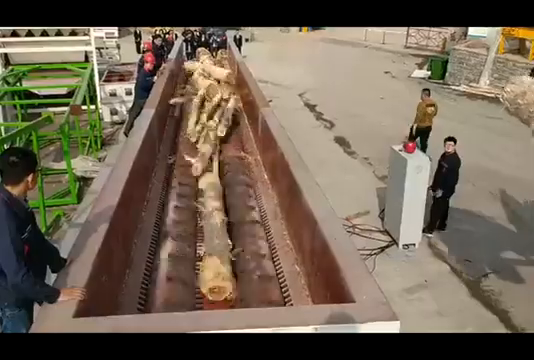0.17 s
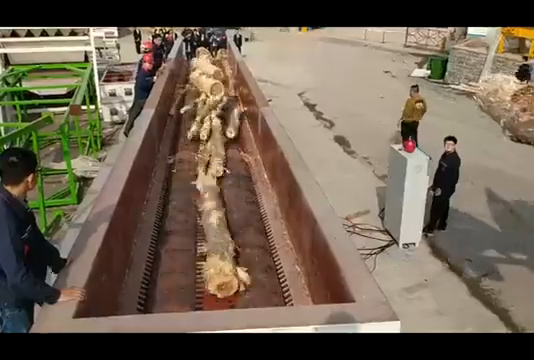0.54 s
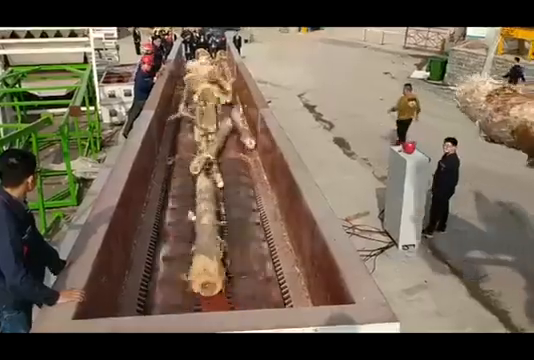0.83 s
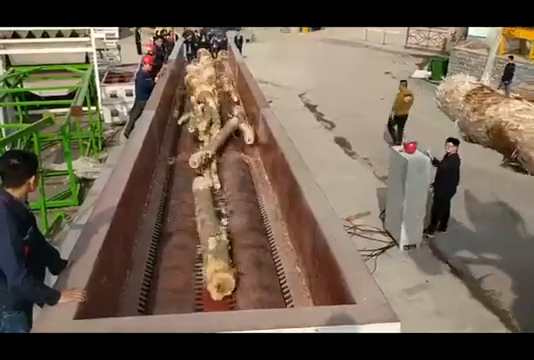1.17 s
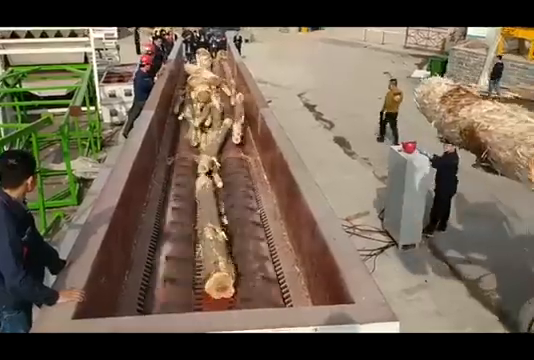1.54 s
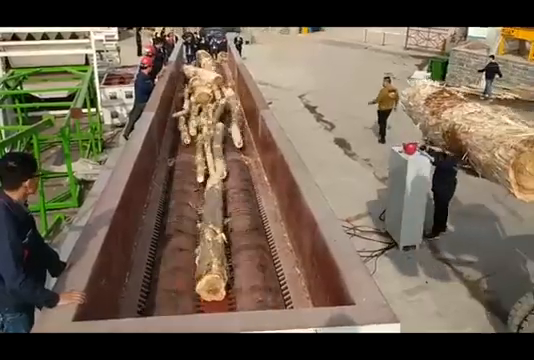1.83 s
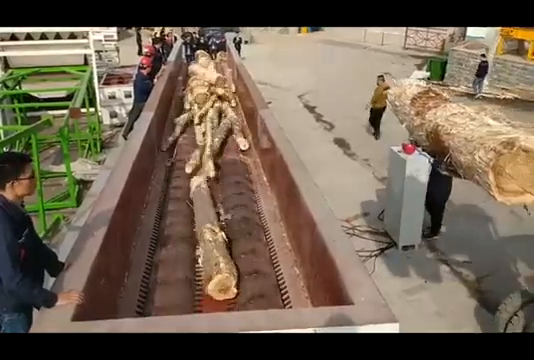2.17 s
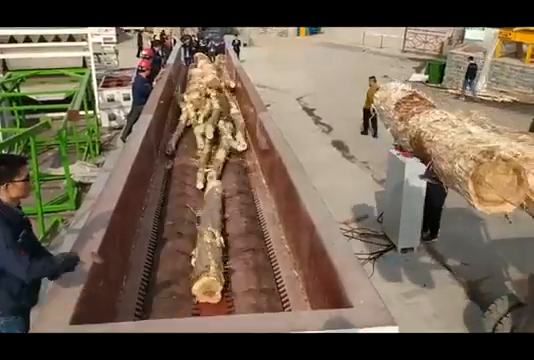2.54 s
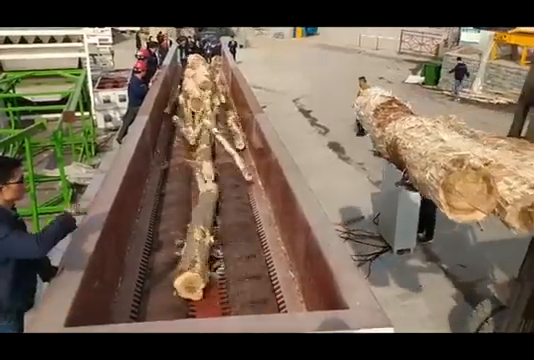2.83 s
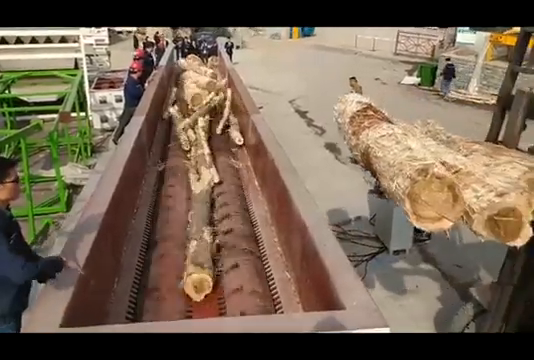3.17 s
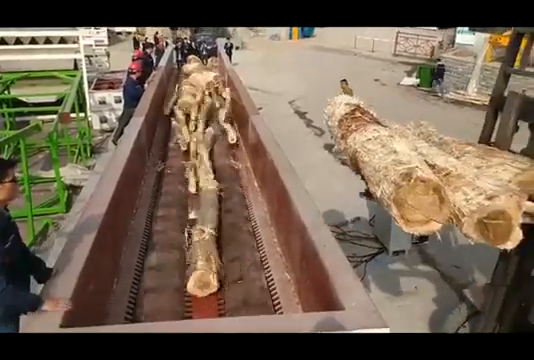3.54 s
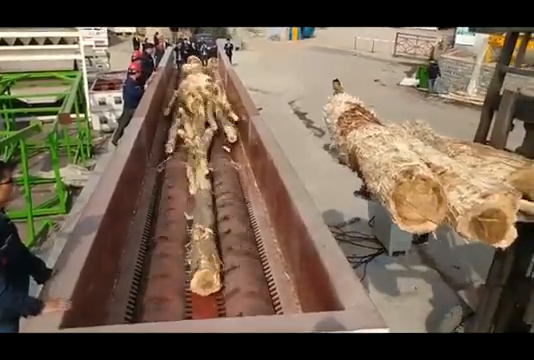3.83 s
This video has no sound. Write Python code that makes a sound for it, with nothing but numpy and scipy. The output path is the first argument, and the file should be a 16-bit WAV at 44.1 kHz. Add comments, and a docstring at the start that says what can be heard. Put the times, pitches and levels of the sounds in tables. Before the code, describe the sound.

After a brief silence, a log debarking machine cuts in at full roar: logs tumble and knock, the steel trough booms, teeth scrape bark. Outdoors, close at the trough's end, in stereo with dulled top.

```python
"""Outdoors, at the end of a debarking machine's long steel trough: logs tumble in a roar that cuts in abruptly.
Harmonic sines make a wavering drive hum. Toothed rotors thump the logs and boom the trough: noise bursts
through panel resonances; single panels groan as bent sines. Knocks of wood are damped mode clusters.
The teeth scrape, rasp off bark and set the steel ringing, more on the left: shaped noise and swelling modes."""
import sys
import numpy as np
from scipy import signal
from scipy.fft import rfft, irfft, next_fast_len
from scipy.io import wavfile
from scipy.ndimage import uniform_filter1d, map_coordinates

SR = 44100
rng = np.random.default_rng(int(sys.argv[2]) if len(sys.argv) > 2 else 0)


def wav_record(signal):
    """Record a signal, one row per channel, as 16-bit PCM in the file named by sys.argv[1]."""
    frames = np.transpose(np.atleast_2d(signal))
    bounded = np.clip(frames, -1, 1)
    # unit amplitude maps onto the largest positive 16-bit level
    quanta = np.round(bounded * 32767).astype(np.int16)
    wavfile.write(sys.argv[1], SR, quanta)


N = 176400


def amp(db):
    """Decibels to gain."""
    return 10 ** (np.asarray(db) / 20)


def unit(x):
    """Scale to rms 1."""
    return x / np.sqrt(np.mean(x ** 2) + 1e-20)


def along(points, hz):
    """Interpolate (Hz, value) points on a log frequency axis."""
    point_hz, value = np.transpose(points)
    return np.interp(np.log(hz + 1), np.log(point_hz + 1), value)


def curves(rows):
    """One value per sample for each column after the time."""
    time_s, *columns = np.transpose(rows)
    return [np.interp(np.arange(N) / SR, time_s, column) for column in columns]


def wobble(knots_per_s):
    """A smooth random curve through normal random knots."""
    return map_coordinates(rng.standard_normal(1000), [np.arange(N) * knots_per_s / SR], mode="wrap")


def filtered(x, response):
    """Multiply the spectrum of x by a complex response of frequency."""
    size = next_fast_len(N + SR // 2)
    hz = np.fft.rfftfreq(size, 1 / SR)
    return irfft(rfft(x, size) * response(hz), size)[..., :N]


def coloured(x, spectrum):
    """Shape x by a spectrum, at rms 1."""
    return unit(filtered(x, lambda hz: amp(along(spectrum, hz))))


def resonate(x, modes):
    """Ring a set of second-order band-pass modes with x, at rms 1."""
    def response(f):
        return sum(amp(db) * 1j * f * width / (hz * hz - f * f + 1j * f * width) for hz, width, db in modes)
    return unit(filtered(x, response))


MODE_SWELL_DB, MODE_SWELLS_PER_S = 2.5, 14


def shifting(x, modes):
    """Ring modes that each swell and fade at random on their own, at rms 1."""
    total = 0
    for hz, width_hz, db in modes:
        gain = amp(db + MODE_SWELL_DB * wobble(MODE_SWELLS_PER_S))
        total = total + gain * np.sqrt(abs(width_hz)) * resonate(x, [(hz, width_hz, 0)])
    return unit(total)


CONTACTS_PER_S, CONTACT_SPREAD_DB = 500, 0.5


def contacts(t60_s, bed):
    """Two channels of decaying noise bursts at shared random moments, over a steady bed."""
    struck = rng.random(N) < CONTACTS_PER_S / SR
    hit_power = struck * amp(-CONTACT_SPREAD_DB * rng.random(N)) ** 2
    power = signal.lfilter([1], [1, -amp(-120 / (t60_s * SR))], hit_power)
    envelope = np.sqrt(power / power.mean() + abs(bed))
    return unit(envelope * rng.standard_normal((2, N)))


def patchy(x, depth_db):
    """Shift the colour of x at random, in small short-lived time-frequency patches."""
    z = signal.stft(x, nperseg=1024)[2]
    field = rng.standard_normal(z.shape[1:])
    field = uniform_filter1d(field, size=3, axis=0)  # bins
    field = uniform_filter1d(field, size=5, axis=1)  # frames
    return unit(signal.istft(z * amp(depth_db * unit(field)), nperseg=1024)[1][:, :N])


# hum's third harmonic: time_s, pitch_hz, level_db
DRIVE_THIRD = [(.4, 223.6, -27), (.9, 219.7, -25.5), (1.25, 224.1, -21.5), (1.55, 221.1, -27),
               (1.7, 222.9, -18), (1.87, 220, -16.5), (2.06, 222.6, -13.5), (2.17, 223.7, -25.5),
               (2.45, 229.7, -20), (2.57, 221.9, -21.5), (2.74, 224, -19), (2.9, 217.8, -30),
               (4, 222.3, -28.5)]
# other harmonics: harmonic_number, level_db
DRIVE_OTHERS = [(2, -32.5), (4, -28.5)]
HUM_WAVER_DB = 2.5


def drive():
    """The drive's hum: locked harmonics; the third swells as the load changes."""
    third_hz, third_db = curves(DRIVE_THIRD)
    turn_rad = 2 * np.pi * np.cumsum(third_hz) / SR / 3  # phase of the fundamental
    hum = amp(third_db) * np.sin(3 * turn_rad + .17 * wobble(12))
    for harmonic, level_db in DRIVE_OTHERS:
        gain = amp(level_db + HUM_WAVER_DB * wobble(6))
        hum = hum + gain * np.sin(round(harmonic) * turn_rad + 0.77 * wobble(8))
    return np.sqrt(2) * hum


# panel groans: middle_s, length_s, pitch_hz, level_db
PANEL_GROANS = [(0.967, .25, 183, -25), (2.247, 0.54, 147.8, -24.5), (3.08, 0.35, 188.4, -27),
                (3.67, .13, 147.9, -20.5), (3.784, .2, 301, -21.5)]


def groans():
    """A log dragged along the wall makes one panel sing for a moment: a phase-wavering sine."""
    t_s = np.arange(N) / SR
    total = np.zeros(N)
    for middle_s, length_s, pitch_hz, level_db in PANEL_GROANS:
        swell = np.exp(-(2 * (t_s - middle_s) / length_s) ** 4)
        total += amp(level_db) * swell * np.sin(2 * np.pi * pitch_hz * t_s + .5 * wobble(10))
    return np.sqrt(2) * total


# trough boom: time_s, level_db
BOOM_LEVEL = [(.4, -16.5), (1.6, -16), (2.18, -18.5), (2.33, -15), (2.45, -20.5), (2.8, -17.5),
              (3.1, -17.5), (3.55, -17.5), (3.85, -16.5)]
# trough panel modes: pitch_hz, width_hz, relative_db
PANEL_MODES = [(68.5, 7.3, -11), (89, 6.7, -1), (143, 8.3, -5), (188.4, 17, 3), (253.6, 30, 1),
               (303.7, 11, -0.5), (350.4, 33.6, -1.5), (390, 7.3, -7)]
# boom spectrum: freq_hz, relative_db_per_hz
BOOM_SPECTRUM = [(15, -25), (35, -12), (65, -1.5), (115, -7.5), (170, 0), (260, -1.5), (400, -4),
                 (480, -24.5), (800, -23), (2000, -72)]
BOOM_DB, PANEL_DB = -1.5, -1


def trough():
    """Thumps of logs on the rotors merge into a boom that rings the trough's panels."""
    level_db, = curves(BOOM_LEVEL)
    thumps = contacts(t60_s=0.16, bed=2.3)
    panels = resonate(thumps, PANEL_MODES)
    panels = unit(filtered(panels, lambda hz: 1 / (1 + (hz / 560) ** 6)))  # low-pass
    body = coloured(contacts(t60_s=0.083, bed=1.6), BOOM_SPECTRUM)
    return amp(level_db) * (amp(BOOM_DB) * body + amp(PANEL_DB) * panels)


# tooth contact, shared by steel and teeth: time_s, scrape_db, bark_db (bark before BARK_DB, TIP_DB)
TEETH_LEVEL = [(.44, -24.5, -30), (.8, -20, -26.5), (.9, -21.5, -27.5), (1.16, -23, -29),
               (1.33, -21.5, -27.5), (2, -25, -31), (2.42, -23, -27), (3.4, -20.5, -26), (3.6, -22.5, -28),
               (3.76, -22.5, -27), (4, -22, -30)]
# ringing steel modes: pitch_hz, width_hz, relative_db
STEEL_MODES = [(1890, 56, -5), (2233, 31, -5), (2374, 65, -6.5), (2543, 73, -1.5), (2614, 19, 5),
               (2700, 100, -4), (2790, 30, -0.5), (2990, 90, -9)]
RING_DB, RING_LEFT_OVER_RIGHT_DB, RING_CENTRE_HZ = -3, 10.5, 2410
RING_SPEED_WAVER, RING_ALIKE = 0.00202, 0.46  # fraction of speed; gain of the shared part


def steel():
    """Steel modes ring in wavering strands, at a level following the scrape, louder on the left."""
    scrape_db, _ = curves(TEETH_LEVEL)
    ring = shifting(contacts(t60_s=0.011, bed=1), STEEL_MODES)
    ring = filtered(ring, lambda hz: 1 / (1 + (np.log2((hz + 1) / RING_CENTRE_HZ) * 2) ** 4))
    bent_time = np.arange(N) + np.cumsum(RING_SPEED_WAVER * wobble(10))
    ring = np.array([map_coordinates(side, [bent_time]) for side in ring])
    ring = unit(ring + RING_ALIKE * ring.mean(axis=0))
    balance = amp(RING_LEFT_OVER_RIGHT_DB * np.array([[.5], [-.5]]))
    return amp(scrape_db + RING_DB) * ring * balance


# scrape spectrum: freq_hz, relative_db_per_hz
SCRAPE_SPECTRUM = [(700, -11.5), (1250, -2.5), (1600, -2), (2000, -0.5), (2600, 3.5), (3200, -6.5),
                   (3900, -8), (4400, -13), (7500, -42.5)]
# bark spectrum: freq_hz, relative_db_per_hz
BARK_SPECTRUM = [(2500, -16), (3500, 1.5), (4300, -11), (4900, 3), (5500, -4.5), (6100, -1.5), (7000, 3),
                 (7500, 4)]
# tooth tip modes: pitch_hz, width_hz, relative_db
TIP_MODES = [(4569, 50, -4), (5170, 60, -2), (5786, 35, -7), (6406, 70, -1), (6737, 65, 0)]
BARK_DB, TIP_DB = 8, -7.5


def teeth():
    """Rotor teeth scrape the wood and tear off splinters of bark; their tips ring faintly."""
    scrape_db, bark_db = curves(TEETH_LEVEL)
    scrape = patchy(coloured(contacts(t60_s=0.12, bed=.5), SCRAPE_SPECTRUM), depth_db=4.5)
    splinters = coloured(patchy(contacts(t60_s=0.042, bed=1), depth_db=4.0), BARK_SPECTRUM)
    tips = shifting(contacts(t60_s=0.0062, bed=0.94), TIP_MODES)
    bark = amp(BARK_DB) * splinters + amp(TIP_DB) * tips
    return amp(scrape_db) * scrape + amp(bark_db + 1.0 * wobble(14)) * bark


KNOCK_ATTACK_S = 0.00087


def knock(pitch_hz, spread, t60_s, count):
    """One wooden knock: a cluster of damped modes scattered around a pitch, in two channels."""
    t_s = np.arange(int(t60_s * SR)) / SR
    modes_hz = pitch_hz * np.exp(spread * rng.standard_normal((count, 1)))
    cycles = modes_hz * t_s + rng.random((2, count, 1))
    ring = np.sin(2 * np.pi * cycles).sum(1) / np.sqrt(count / 2)
    return ring * 10 ** (-3 * t_s / t60_s) * (1 - np.exp(-t_s / KNOCK_ATTACK_S))


def add(track, start_s, sound):
    """Mix a sound into a track."""
    part = track[:, round(start_s * SR):][:, :sound.shape[1]]
    part += sound[:, :part.shape[1]]


KNOCKS_PER_S, KNOCK_CENTRE_HZ, KNOCK_T60_CYCLES = 300, 899.3, 56
CLUMPING, CLUMPS_PER_S = .35, 30  # log-density spread, knots per second


def small_knocks():
    """Many small knocks, over two octaves of pitch and 9 dB of level, clumped in time."""
    track = np.zeros((2, N))
    tossing = np.cumsum(np.exp(CLUMPING * wobble(CLUMPS_PER_S)))
    for when, pitch, size in rng.random((int(KNOCKS_PER_S * N / SR), 3)):
        hz = KNOCK_CENTRE_HZ * 2 ** (2 * (pitch - .5))
        start_s = np.searchsorted(tossing, when * tossing[-1]) / SR
        add(track, start_s, amp(-9 * size) * knock(hz, 0.2526, KNOCK_T60_CYCLES / hz, count=3))
    return track


# heavy log blows: start_s, level_db, pitch_hz
HEAVY_BLOWS = [(.374, -12.5, 350), (.578, -13.5, 716), (.995, -19, 771), (1.29, -14, 320),
               (1.345, -15, 773.6), (2.275, -16, 698), (2.336, -14, 406), (2.409, -15.5, 1165),
               (2.435, -15, 954), (2.526, -14, 924), (3.186, -22.5, 1147), (3.66, -17.5, 1002),
               (3.829, -11.5, 403.3)]
BLOW_SPREAD, BLOW_T60_S = .2, 0.31


def heavy_blows():
    """Heavier log blows: dense mode clusters that ring on."""
    track = np.zeros((2, N))
    for start_s, level_db, pitch_hz in HEAVY_BLOWS:
        add(track, start_s, amp(level_db) * knock(pitch_hz, BLOW_SPREAD, BLOW_T60_S, count=24))
    return track


# sharp cracks of wood: start_s, level_db
WOOD_CRACKS = [(2.409, -10.5), (3.889, -17)]
# crack spectrum: freq_hz, relative_db_per_hz
CRACK_SPECTRUM = [(400, -17), (1000, -1.5), (2100, -2), (3500, -16.5), (7000, -31.5)]
CRACK_T60_S = 0.06


def sharp_cracks():
    """Cracks of wood: coloured noise under sudden, decaying envelopes."""
    t_s = np.arange(SR // 8) / SR
    snap = coloured(rng.standard_normal((2, N)), CRACK_SPECTRUM)
    envelope = np.zeros((2, N))
    for start_s, level_db in WOOD_CRACKS:
        add(envelope, start_s, amp(level_db) * 10 ** (-3 * t_s[None] / CRACK_T60_S))
    return envelope * snap


# log clatter: time_s, level_db
TUMBLE_LEVEL = [(.4, -18), (.58, -15.5), (.7, -17.5), (1.15, -18.5), (1.33, -18), (1.6, -19.5), (2.02, -19),
                (2.22, -26), (2.29, -20.5), (2.39, -20.5), (2.6, -20), (3.4, -19.5), (3.6, -22), (4, -18)]
# wood spectrum: freq_hz, relative_db_per_hz
WOOD_SPECTRUM = [(200, -38.5), (400, -5.5), (520, -1.5), (700, -1.5), (870, 2.5), (1150, -2), (1400, -11),
                 (2200, -9), (5000, -61.5)]
WOOD_DB, KNOCK_DB = -1, -3.5


def logs():
    """Logs clatter in clumps as the rotors toss them, with heavier blows and sharp cracks."""
    level_db, = curves(TUMBLE_LEVEL)
    clatter = patchy(coloured(contacts(t60_s=0.053, bed=0.74), WOOD_SPECTRUM), depth_db=2.5)
    knocks = coloured(small_knocks(), WOOD_SPECTRUM)
    tumble = amp(level_db) * (amp(WOOD_DB) * clatter + amp(KNOCK_DB) * knocks)
    return tumble + heavy_blows() + sharp_cracks()


# stereo width: freq_hz, side_over_mid_db
STEREO_WIDTH = [(60, -25), (170, -18), (370, -17), (580, -10), (900, -12), (1150, -9), (1500, -2),
                (2300, -3), (3200, 0)]
# stereo balance: freq_hz, left_over_right_db
STEREO_BALANCE = [(80, 0), (200, -.8), (400, -.4), (600, -1.4), (1150, -.8), (1500, -2.8), (2500, 1.8),
                  (3500, .8), (5200, -2.8), (7000, 2.6)]
# stereo phase: freq_hz, left_lead_rad
STEREO_LEAD = [(700, 0), (1120, -.15), (1460, -.7), (2580, -.6)]


def scene():
    """The bass reaches both ears alike; the treble is scattered by the trough's walls."""
    def mid_side_gain(hz):
        angle_rad = np.arctan(amp(along(STEREO_WIDTH, hz)))
        return np.array([np.cos(angle_rad), np.sin(angle_rad)])

    half = np.array([[.5], [-.5]])

    def left_right_gain(hz):
        return amp(half * along(STEREO_BALANCE, hz)) * np.exp(1j * half * along(STEREO_LEAD, hz))

    mid, side = filtered(trough() + teeth() + logs(), mid_side_gain)
    mid = mid + drive() + groans()
    pair = np.array([mid + side, mid - side]) + steel()
    return filtered(pair, left_right_gain)


START_S, RISE_S = .371, 0.005
LIMIT_DB, LIMIT_SLOPE, LIMIT_WINDOW_S = -7.5, 0.46, 0.036  # slope: dB cut per dB over
TOP_HZ = 7510


def record(dry):
    """The sound cuts in; a limiter holds swells down, peaks are rounded, the band ends near TOP_HZ."""
    opened = np.clip((np.arange(N) / SR - START_S) / RISE_S, 0, 1)
    power = uniform_filter1d(np.mean(dry ** 2, axis=0), int(LIMIT_WINDOW_S * SR))
    level_db = 10 * np.log10(np.abs(power) + 1e-12)
    held = dry * amp(-LIMIT_SLOPE * np.maximum(level_db - LIMIT_DB, 0))
    rounded = held / (1 + np.abs(held) ** 6) ** (1 / 6)
    return filtered(rounded * opened, lambda hz: np.clip((TOP_HZ - hz) / 110 + .6, 0, 1))


dry = scene()
out = record(dry)
wav_record(out)
```